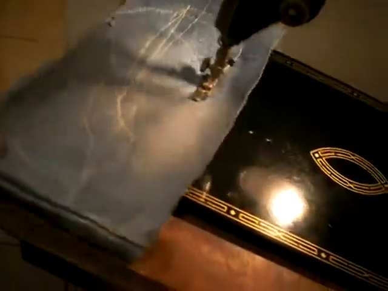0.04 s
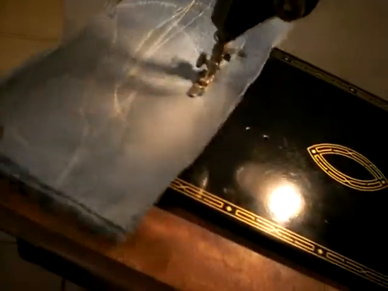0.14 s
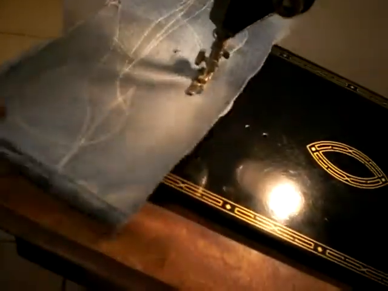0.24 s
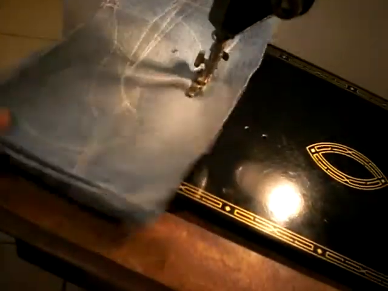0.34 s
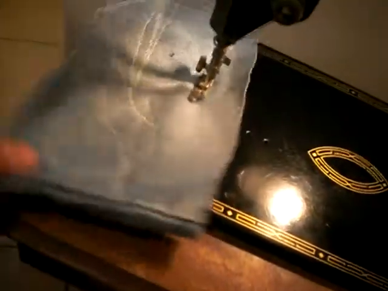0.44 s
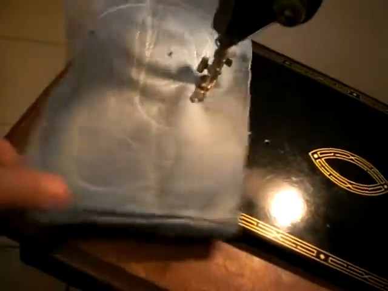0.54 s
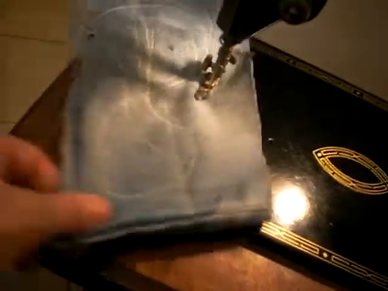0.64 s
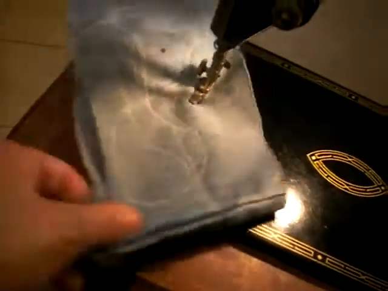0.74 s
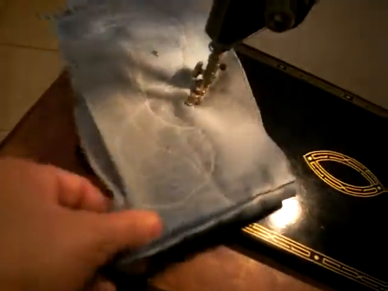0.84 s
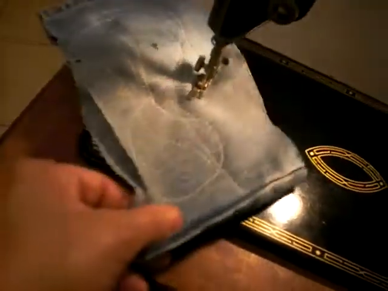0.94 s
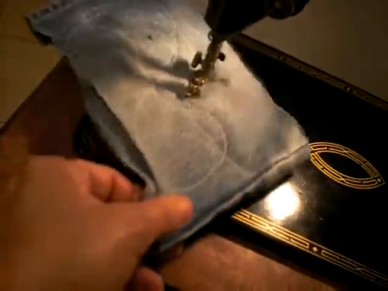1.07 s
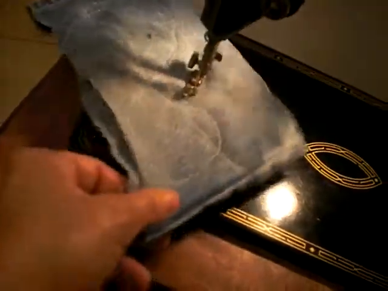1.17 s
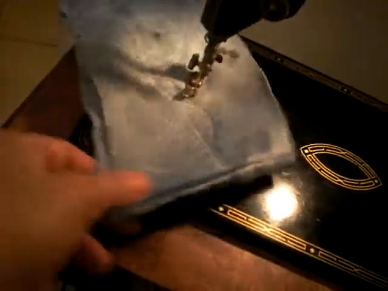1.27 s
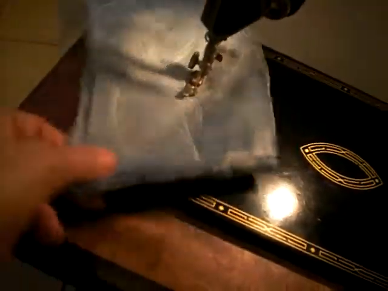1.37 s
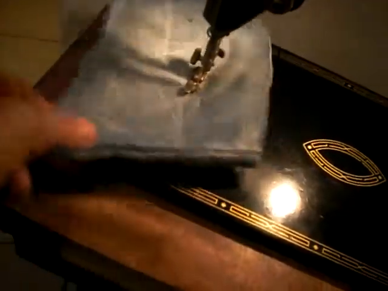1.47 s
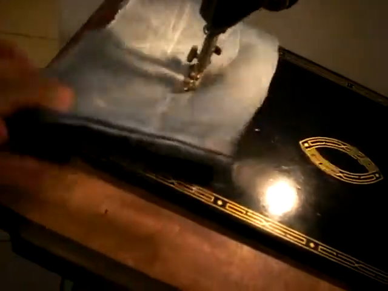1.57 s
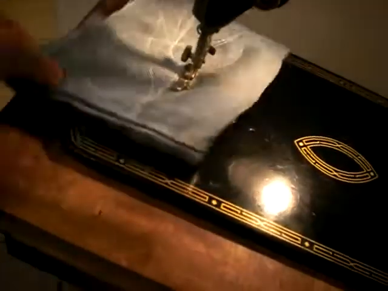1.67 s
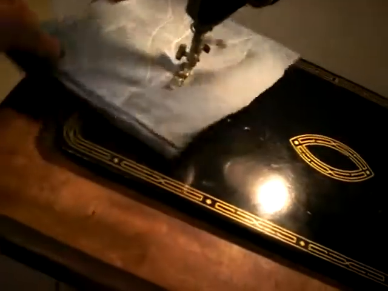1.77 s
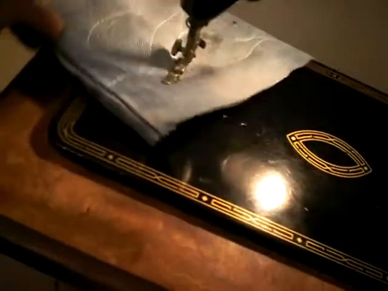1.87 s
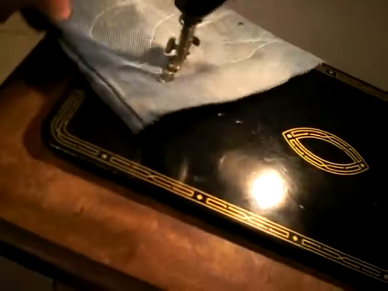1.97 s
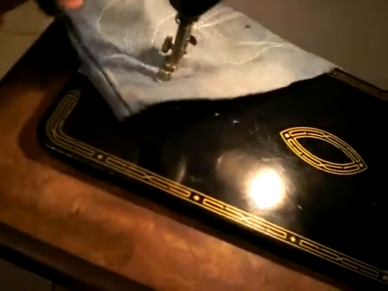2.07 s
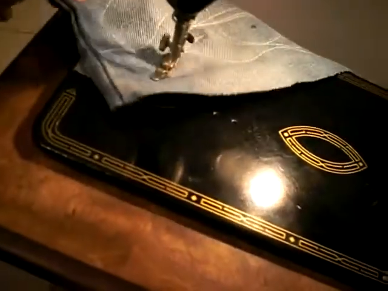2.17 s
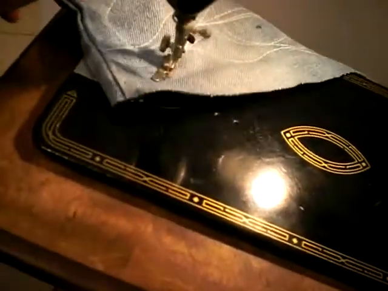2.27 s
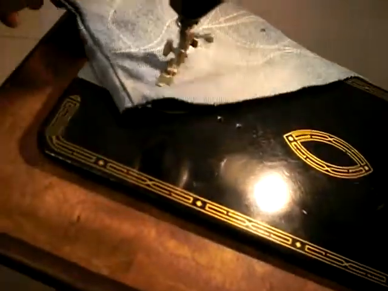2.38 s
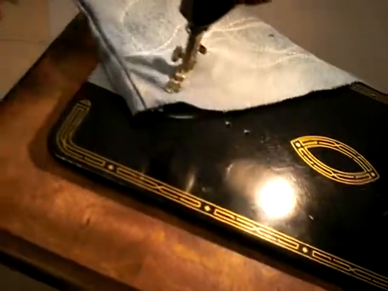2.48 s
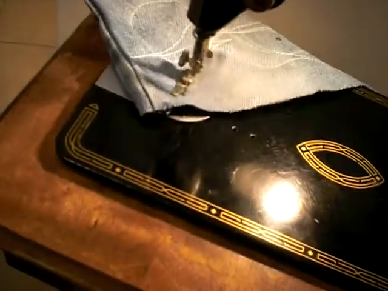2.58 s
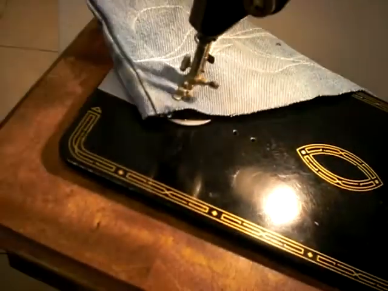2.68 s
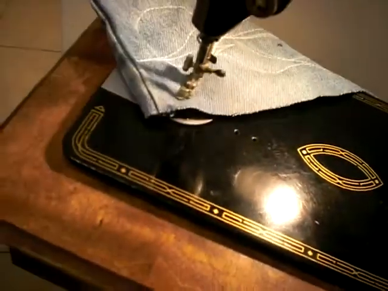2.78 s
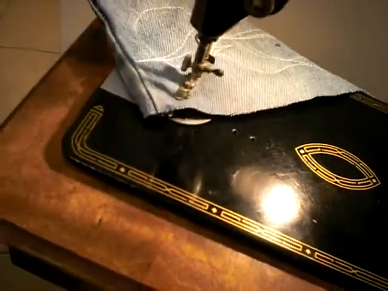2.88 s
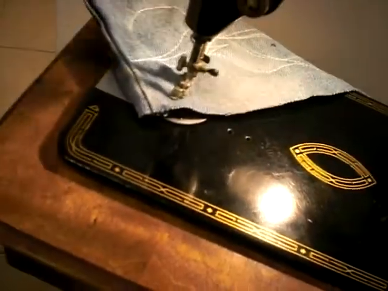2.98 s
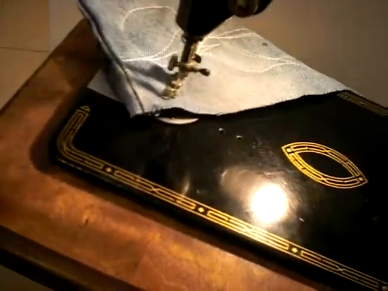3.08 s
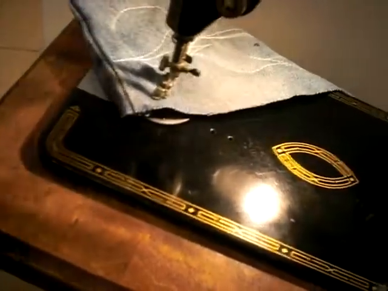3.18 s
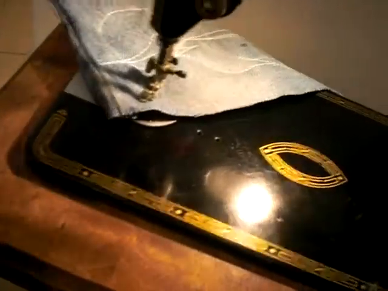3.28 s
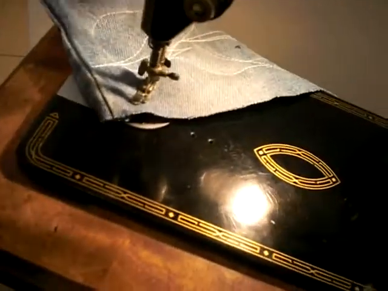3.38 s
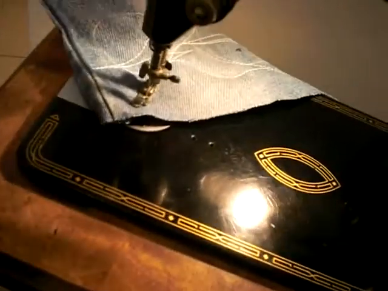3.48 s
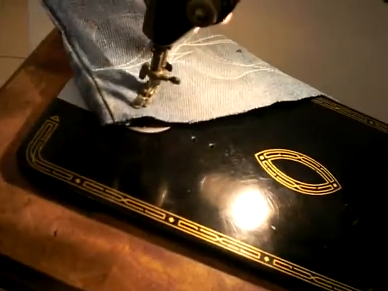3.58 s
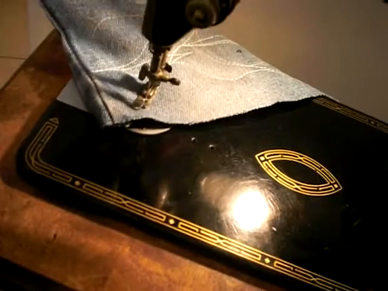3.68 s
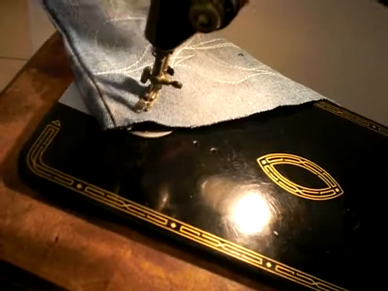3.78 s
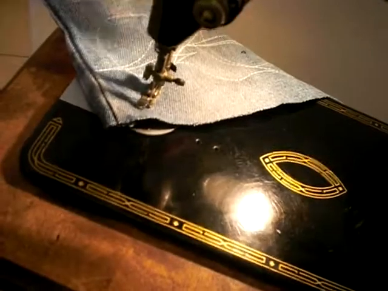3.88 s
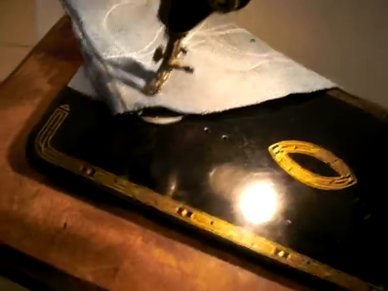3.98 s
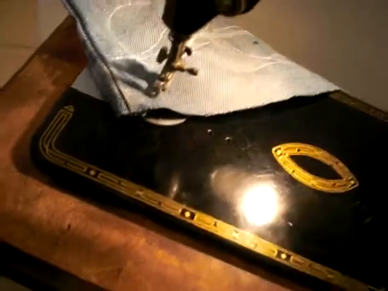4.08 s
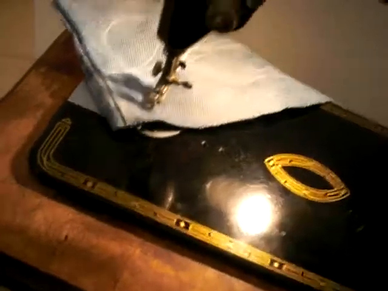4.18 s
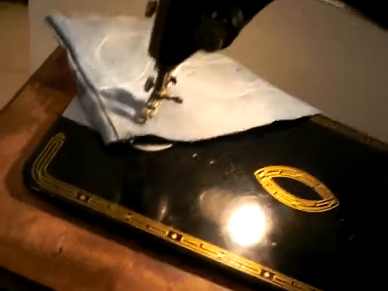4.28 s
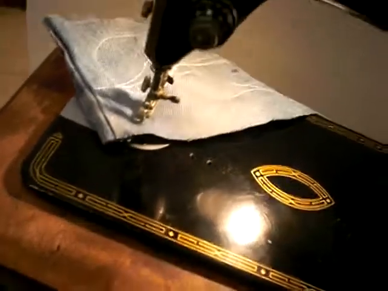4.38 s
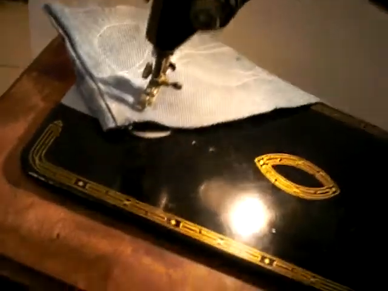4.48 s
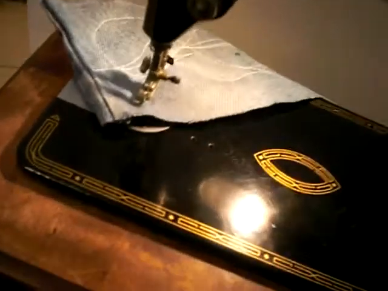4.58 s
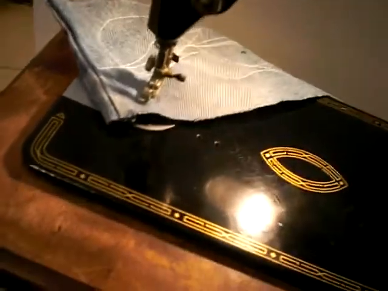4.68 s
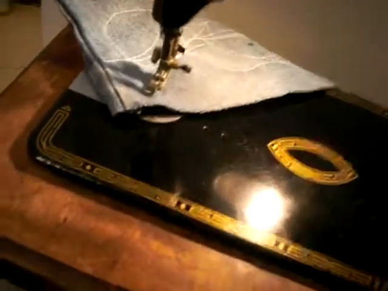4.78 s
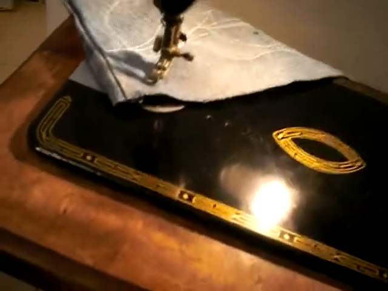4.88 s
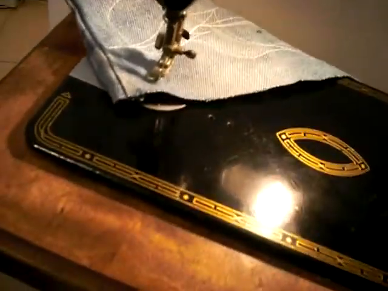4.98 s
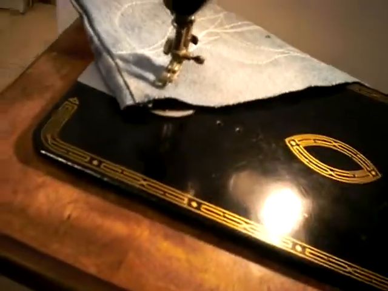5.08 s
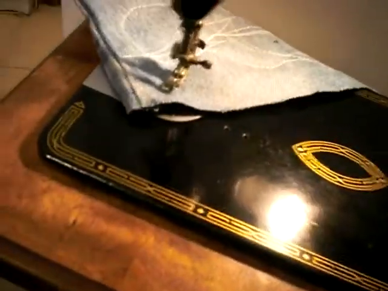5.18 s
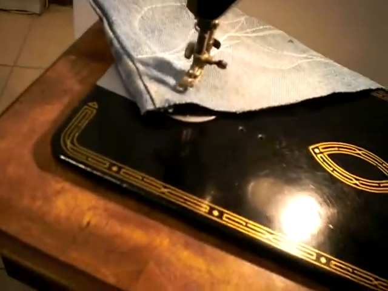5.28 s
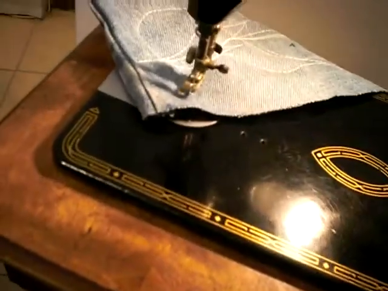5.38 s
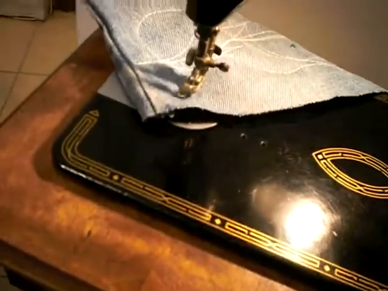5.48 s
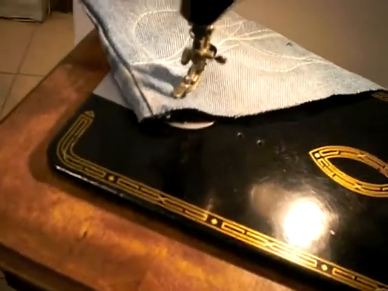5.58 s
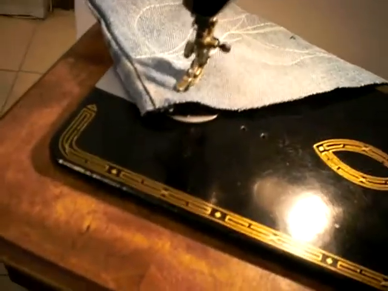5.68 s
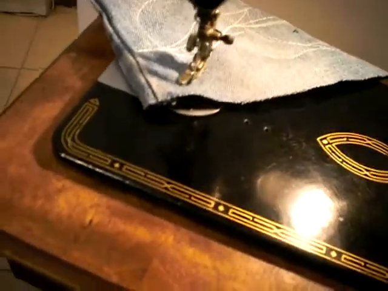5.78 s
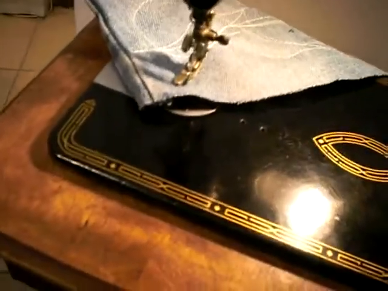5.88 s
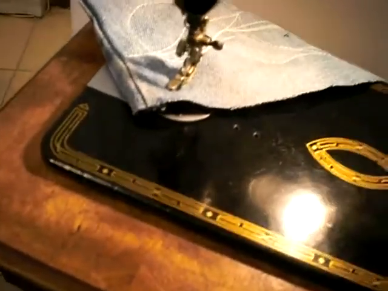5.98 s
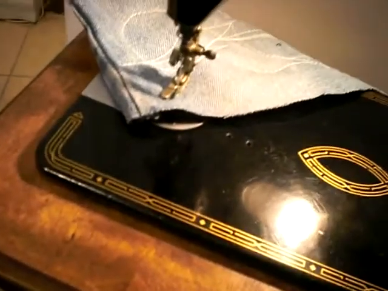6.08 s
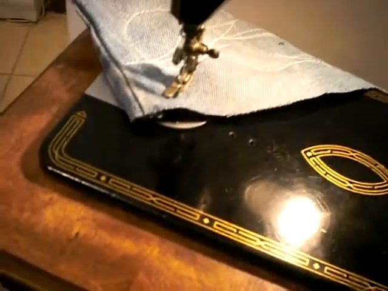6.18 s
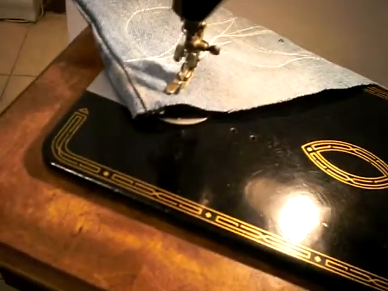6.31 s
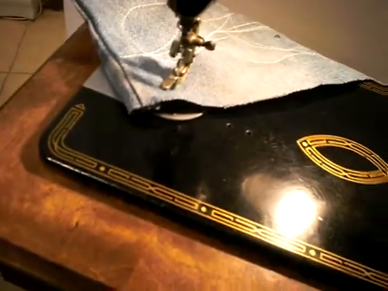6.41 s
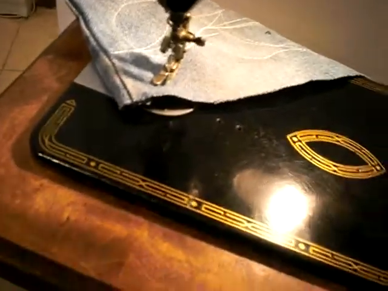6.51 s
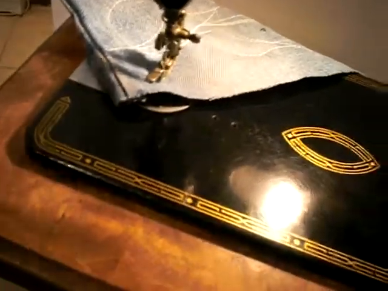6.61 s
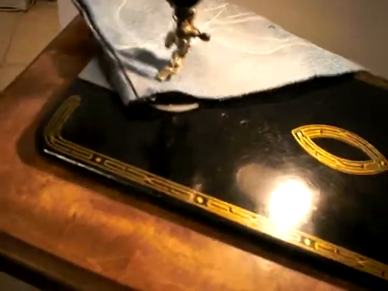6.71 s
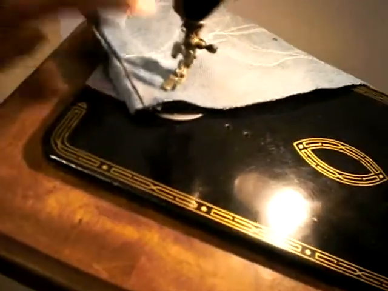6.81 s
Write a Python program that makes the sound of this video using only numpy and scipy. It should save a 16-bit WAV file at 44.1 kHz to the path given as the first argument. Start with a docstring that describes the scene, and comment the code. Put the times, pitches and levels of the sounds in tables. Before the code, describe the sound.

From the very start, an old cast-iron sewing machine is already running fast, about twelve stitches a second: a dense, regular metallic clatter with dry clacks, a hollow mid-low boom from the bed, rushing gears and a low motor hum. Thread-tightening snaps vary slightly from stitch to stitch. Around 2.3 s it slows sharply, the motor hum cuts near 2.5 s, and the last limp ticks die by 2.8 s. A quiet room remains, with wavering low hum and faint hiss. Cloth brushes softly around 3.2 and 3.5 s. A low lever clunk comes at 3.75 s, then a brighter double click near 4.1 s. Gentle fabric rustling continues. Tiny squeaks around 5.4 s precede a sharp catch click at 5.64 s and a heavier springy clunk at 5.8 s. Faint squeaks and cloth bumps follow near 6 s, then light rustling and room hum to the end, about 6.85 s.

```python
"""An old cast-iron sewing machine stitches fast, coasts to a stop, and is then handled in a quiet room.
Every turn of the shaft knocks the same joints in the same order; the bed booms, the motor hums.
Afterwards levers click and something squeaks over a faint room hum."""
import sys
import numpy as np
from scipy import signal
from scipy.fft import rfft
from scipy.io import wavfile
from scipy.ndimage import uniform_filter1d

SR = 44100
rng = np.random.default_rng(int(sys.argv[2]) if len(sys.argv) > 2 else 0)


def digitize_waveform(pressure):
    """Quantize a signal to 16-bit integers and store it at the path in sys.argv[1].

    Rows of a 2-D input are taken as channels; values are limited to [-1, 1].
    """
    field = np.atleast_2d(pressure).T
    bounded = np.clip(field, -1, 1)
    quanta = np.round(bounded * 32767).astype(np.int16)
    wavfile.write(sys.argv[1], SR, quanta)


N = 302085

# what each metal part rings with: (Hz, dB, t60 s)
PARTS = {
    "needle bar": [(2040, -7, 0.035), (2507, 5, 0.015), (4680, -6, 0.011), (4700, -9, 0.065), (5800, 0.5, 0.0075), (9960, -3, 0.0059), (9560, 2.5, 0.005), (11800, -26, 0.012)],
    "feed dog": [(2305, -3, 0.021), (6206, -1, 0.02), (9800, -4, 0.012), (11300, -15, 0.049)],
    "take-up": [(2490, 13, 0.0031), (4285, 7.5, 0.013), (5000, 7.5, 0.014), (6510, 9, 0.011), (9780, 1.5, 0.0109), (11600, -28.5, .01)],
    "hook": [(2360, -1, 0.027), (3840, -1.5, 0.023), (4320, -8, 0.016), (4590, 5, 0.013), (4620, -12, 0.082), (6070, 0.5, 0.016), (9800, -9, 0.022)],
    "bobbin case": [(2900, -9, 0.035), (4710, -5.5, 0.021), (6940, 7.5, 0.003), (8980, -8.5, 0.013)],
    "lifter": [(700, -8.5, 0.037), (1156, -10, 0.064), (1370, -12.5, 0.057), (2070, -1, 0.031), (2250, -14, 0.099), (4220, -8, .03), (4160, -19, 0.09), (4420, 1, 0.023),
               (5930, -4, 0.018), (8480, -4, 0.018), (10200, -6, 0.013)],
    "lever": [(1130, -8, 0.038), (1318, -6, 0.08), (1444, -13, 0.085), (2050, -5, 0.046), (2180, -11, .1), (2330, -19.5, 0.25), (2420, -10, .04), (3700, -10, .03), (4670, 3.5, 0.017),
              (6050, 0, 0.018), (6500, -7, 0.082), (7300, 4.5, 0.016), (8340, 1.5, 0.017), (9500, -2, 0.018), (11000, 4, 0.013)],
    "catch": [(2080, -20, 0.027), (3300, -18, 0.019), (4890, -10, 0.035), (4910, -26, 0.11), (6100, 0.5, 0.018), (6430, -9, 0.025), (7040, -7, 0.023), (7700, -12, 0.016),
              (8960, -6.5, 0.026), (9800, -10, 0.027), (11000, -11, 0.015)],
    "plate": [(787, -13.5, 0.048), (1250, -19, 0.21), (1374, -14.5, 0.08), (2500, -7, 0.032), (3110, -13, .025), (3310, -1, 0.031), (4240, -6, 0.015), (5300, -7, 0.014), (6730, -10, .02), (8480, -5, 0.013)],
    "spring": [(2930, -14, .03), (4460, -7, 0.018), (5760, -7, 0.018), (6300, -5, .022), (7250, -8, .022), (7660, -5, .022), (8330, -4, 0.015), (9420, -10, 0.028), (10800, -16, 0.014)],
    "pin": [(2600, -7, .014), (3710, 1, 0.0063), (4670, -7, .014), (5260, -7, .022), (7500, -6, 0.011), (10200, 1, .007), (11700, 0, .012)],
    "fabric": [(890, 13, 0.0016), (2510, 0, 0.00098), (5530, 14, 0.00067)],
}
# blows in each turn: (part, dB, rattle length s, wide crack dB, dB lost when the speed halves)
BLOWS = [("needle bar", -2.74, 0.0047, 7.6, 1), ("needle bar", -2, 0.0049, 2.6, 7), ("feed dog", 0, 0.0019, 1, -2), ("bobbin case", -2.5, 0.0067, 3, 6.4),
         ("take-up", -4, 0.0039, 4, 2.9), ("hook", -1.5, 0.003, 4, 3.2), ("bobbin case", -1.2, 0.0045, 0.87, 16),
         ("take-up", -8, 0.004, 2, 16)]  # fixed
BED = [(102, -13, 0.081), (150, -18, 0.031), (193, -10, 0.037), (310, -5.5, 0.12), (339, -1.5, 0.13), (410, 0, 0.046), (497, -13, 0.047), (664, -3.5, 0.046),
       (706, -7.5, 0.061), (909, -12, 0.047), (1127, -8.5, 0.059), (1374, -10.5, 0.093)]  # iron bed and table: (Hz, dB, t60 s)
# knocks into the bed in each turn: (share of the turn, dB, Hz that it favours, breadth in octaves, rise s)
KNOCKS = [(-.03, 1.5, 1040, 0.48, 0.00053), (.05, -33, 152.6, 0.79, 0.0032), (.27, 11.5, 890, 0.91, 0.01), (0.521, 0.5, 425, 1, 0.0069),
          (0.699, 15, 993, 0.12, 0.0046), (0.783, -5, 640, 0.44, 0.00069)]
# last settling ticks, and handling after the stop: (s, part, dB, rattle length s, wide crack dB, bed knock dB, Hz that it favours)
CLICKS = [(2.587, "needle bar", -36, 0.007, 2, -51, 395), (2.73, "hook", -54, 0.0025, 5, -59, 400),
          (2.766, "hook", -59, 0.0047, 8, -59, 403), (2.794, "hook", -56, 0.005, 4, -62, 400),
          (3.196, "fabric", -53, 0.0048, -3, -60, 400), (3.486, "fabric", -48.5, 0.0045, -5, -61, 400),
          (3.7507, "lifter", -27, 0.0015, -14, -27.5, 310), (3.779, "fabric", -60, .004, -10, -34, 320), (4.0714, "pin", -28, 0.0015, -12, -62, 397),
          (4.081, "catch", -40, 0.0022, 4, -65.5, 400),
          (4.087, "lever", -22.5, 0.0019, 1.5, -33, 344), (4.33, "fabric", -46, 0.0024, -2, -60, 400),
          (5.462, "catch", -60, .002, 6, -56, 400), (5.486, "fabric", -40, 0.024, -20, -32, 300), (5.6362, "catch", -15.5, 0.00042, -14, -46, 600),
          (5.806, "plate", -21.5, 0.0012, -16, -25.5, 493), (5.8107, "spring", -26.5, 0.0017, 3, -9.5, 148),
          (5.8159, "spring", -29.5, 0.002, 2.5, -62, 400), (6.009, "fabric", -49, 0.011, -7, -29, 313), (6.027, "fabric", -48, 0.0046, -13, -43, 328)]
SQUEAKS = [(5.384, 0.098, 2360, -62), (5.472, .03, 2360, -57), (5.994, 0.042, 2370, -59), (6.019, 0.032, 2350, -55)]  # (s, length s, Hz, dB)
WHIRR = [(30, -45), (60, -12), (110, -8), (270, -7.5), (350, -5), (480, -11.5), (690, -6.5), (1000, -8.5), (1500, -11),
         (2400, -11), (4600, -15.5), (7900, -17), (9700, -19.5), (12300, -22)]  # (Hz, dB per Hz)
AIR = [(18, -60), (42, -66), (86, -24), (108, -5.5), (161, -12.5), (192, -3.5), (217, -13), (341, -11), (387, -18),
       (473, -15.5), (800, -24.5), (1170, -26.5), (2130, -36), (2730, -34), (12000, -44), (15600, -66), (22000, -120)]  # room air and microphone hiss: (Hz, dB per Hz)
AIR_DB = [(3.8, -48.5), (4.6, -50.5), (5.55, -47.5), (6.85, -49.5)]  # level of the room air: (s, dB)
HUM = [(4.0, -48), (4.3, -50.5), (4.75, -48), (6.85, -50)]  # a wavering hum in the room: (s, dB)
HUM_HZ, FAINT_HUMS = 189, [(120, -61.5), (154.7, -69.5), (240, -62.5), (415.2, -63.5)]  # (Hz, dB)
ROOM = [(200, 0.32), (1000, 0.3), (4000, 0.17), (12000, 0.21)]  # (Hz, t60 s)
EDGE_HZ = 12050  # fixed
CLOTH = [(300, -35), (700, 9.5), (1300, 0), (3000, -2.5), (6000, -18), (12000, -15)]  # (Hz, dB per Hz)
# the bed shakes at its main pitches while the needle bar strokes: (Hz, from share of the turn, length s, dB)
BOOM = [(345, .589, 0.068, -2.5), (352.3, 0.33, 0.0274, -4), (707, .22, 0.023, -9), (408, .758, 0.04, -8.5), (698, .73, 0.017, -8), (915, .66, 0.019, -8.5)]
BLOW_SHARES = (-.025, .015, .27, .4, .485, .588, .69, .895)  # where in the turn each blow falls  # fixed
# main shaft, one stitch a turn; it runs, coasts, crawls and stops: (s, turns per s)
SPEED = [(0, 12.198), (.8, 12.2354), (2.2772, 12.0488), (2.6294, 4.2626), (2.73, 4.2626), (2.84, 0)]  # fixed
CRACK_BAND = signal.butter(3, [2000., 11500.], "bandpass", fs=SR, output="sos")  # fixed
SIZZLE_T60_S = 0.082
SCATTER_DB = .6  # force differs little from turn to turn  # fixed
SNAP_SHARE = .485  # except the blow that pulls the thread tight  # fixed
# extra force of that blow, stitch by stitch from the second on: (dB)
SNAP_DB = [-3, -19, -4, 2, -15, -2, -5, -4, -8, -8, -5, -3, -15, 0.5, -7, 0, -14, -5, -4.5, -37, 1.5, 1, 0, 1, -1, 5]
START_TURNS = -.0252  # shaft angle at 0 s  # fixed
METAL_DB, BED_DB, WHIRR_DB = -22, -25, -29  # at full speed
BED_SLOW_DB, BOOM_SLOW_DB, WHIRR_SLOW_DB = 0, 20, 13  # lost when the speed halves
SLACK_S, SLACK_DB_PER_S = 2.592, -130  # in the last crawl the blows go limp
MOTOR_DB, MOTOR_SAG_DB_PER_S, MOTOR_OFF_S, MOTOR_FADE_DB_PER_S = -41.5, -1.5, 2.46, -380
# fabric slides under the hands, each time swelling and fading: (middle s, half length s, dB)
SLIDES = [(3.197, 0.19, -71), (3.61, 0.59, -67), (4.35, 0.057, -66), (4.8, 0.36, -63), (5.487, 0.056, -57.5), (5.75, 0.22, -61.5), (6.186, 0.053, -61), (6.504, 0.49, -64)]
RUNNING_SPREAD, RESTING_SPREAD = 3.3, 1.7  # cluster half width in Hz times t60 in s  # fixed


def gain_of(db):
    return 10 ** (np.asarray(db) / 20)


def evened(x):
    return x / np.sqrt(np.mean(x ** 2) + 1e-20)


def read(points, hz):
    f, value = np.transpose(points)
    return np.interp(np.log(hz + 1), np.log(f + 1), value)


def curve(rows):
    s, value = np.transpose(rows)
    return np.interp(np.arange(N) / SR, s, value)


def add(mix, s, sound):
    at = round(s * SR)
    part = mix[max(at, 0):][:max(len(sound) + min(at, 0), 0)]
    part += sound[max(-at, 0):][:len(part)]


def ring(modes, rise_s):
    """Dying sines of a struck part."""
    hz, db, t60 = np.transpose(modes)[:, :, None]
    t = np.arange(int(t60.max() * SR) + 64) / SR
    return (gain_of(db - 60 * t / t60) * np.sin(2 * np.pi * hz * t)).sum(0) * (1 - np.exp(-t / rise_s))


def noise(spectrum, patchy_db):
    """Random short-time spectra with drifting patches."""
    frames, hz = N // 256 + 5, np.fft.rfftfreq(1024, 1 / SR)
    a, b, patches = rng.standard_normal((frames, 513, 3)).T
    patches = evened(uniform_filter1d(uniform_filter1d(patches, size=12, axis=0), size=14, axis=1))
    z = (a + 1j * b) * gain_of(read(spectrum, hz)[:, None] + patchy_db * patches)
    return evened(signal.istft(z, nperseg=1024, noverlap=768)[1][:N])


def wander(rate_hz):
    """Slow chance of rms 1."""
    return evened(signal.lfilter([1], [1, -np.exp(-2 * np.pi * rate_hz / SR)], rng.standard_normal(N)))


def clack(part, rattle_s, crack_db, firm, sizzle_db, rise_s, count, spread):
    """One firm tick, then loose metal chatters; the ticks ring the part and are heard as a wide crack with a dense sizzle behind it."""
    t = np.arange(SR // 9) / SR
    ticks, size, hiss = rng.standard_normal((3, len(t)))
    chatter = ticks * gain_of(1.65 * size) * np.exp(-t / max(rattle_s, 2e-4)) * (1 - np.exp(-t / max(0.36 * rattle_s, 1e-5)))
    chatter /= np.linalg.norm(chatter)
    chatter[0] += firm
    # each listed mode stands for a cluster of neighbours, the wider the faster it dies, widest in parts that run loose
    cluster = np.repeat(PARTS[part], count, axis=0)
    places = np.tile(np.linspace(-1, 1, count), len(PARTS[part])) + 0.22 * rng.standard_normal(len(cluster))
    cluster[:, 0] += spread * places / np.maximum(cluster[:, 2], .012)
    push = np.interp(cluster[:, 0], np.fft.rfftfreq(len(t), 1 / SR), abs(rfft(chatter)))
    cluster[:, 1] -= 20 * np.log10(push + 0.3)  # however the ticks fall, the part keeps its colour
    rung = signal.fftconvolve(chatter, ring(cluster, rise_s) / np.sqrt(count))
    wide = 9 * gain_of(crack_db) * chatter + gain_of(sizzle_db - 60 * t / SIZZLE_T60_S) * hiss
    add(rung, 0, signal.sosfilt(CRACK_BAND, wide))
    return rung


def knock(centre_hz, octaves, rise_s):
    """A dull push rings the bed, most near the pitch that its place favours."""
    return ring([(hz, db - 6 * (np.log2(hz / centre_hz) / octaves) ** 2, t60) for hz, db, t60 in BED], rise_s)


def stitching():
    """The shaft angle times every blow; slack in the joints scatters time and force a little."""
    out = np.zeros(N)
    knocks = [knock(*row[2:]) for row in KNOCKS]
    for turn in range(-1, 32):
        for share, (part, db, rattle_s, crack_db, slow_db) in zip(BLOW_SHARES, BLOWS):
            late, hard = rng.standard_normal(2)
            at, halvings = shaft(turn + share)
            if np.isfinite(at):
                force_db = METAL_DB - slow_db * halvings + limp_db(at) + SCATTER_DB * hard
                if share == SNAP_SHARE and 0 < turn <= len(SNAP_DB):
                    force_db += SNAP_DB[turn - 1]
                add(out, at + .0006 * late, gain_of(db + force_db) * clack(part, rattle_s, crack_db, firm=0.35, sizzle_db=-20.5, rise_s=0.00053, count=8, spread=RUNNING_SPREAD))
        for (share, db, *_), sound in zip(KNOCKS, knocks):
            late, hard = rng.standard_normal(2)
            at, halvings = shaft(turn + share)
            if np.isfinite(at):
                force_db = BED_DB - BED_SLOW_DB * halvings + 2 * limp_db(at) + 0.25 * hard
                add(out, at + 0.00028 * late, gain_of(db + force_db) * sound)
    return out


def motor():
    """The windings hum at twice the mains frequency until the current is cut."""
    t = np.arange(N) / SR
    db = MOTOR_DB + MOTOR_SAG_DB_PER_S * t + MOTOR_FADE_DB_PER_S * np.maximum(t - MOTOR_OFF_S, 0)
    return gain_of(db) * np.sqrt(2) * np.sin(2 * np.pi * 120 * t)  # fixed


def handling():
    """Single clicks of levers and plates, brushes of fabric, and short squeaks."""
    out = np.zeros(N)
    for s, part, db, rattle_s, crack_db, bed_db, centre_hz in CLICKS:
        add(out, s, gain_of(db) * clack(part, rattle_s, crack_db, firm=0.98, sizzle_db=-11.0, rise_s=0.00019, count=4, spread=RESTING_SPREAD))
        add(out, s, gain_of(bed_db) * knock(centre_hz, octaves=0.46, rise_s=0.0041))
    for s, length, hz, db in SQUEAKS:
        t = np.arange(round(length * SR)) / SR
        slip = np.cumsum(rng.standard_normal(len(t))) * 0.046  # the phase slips as the joint sticks
        add(out, s, gain_of(db) * np.sqrt(2) * np.sin(2 * np.pi * hz * t + slip) * np.sin(np.pi * t / length))
    return out


def background():
    """Room air, one wavering hum and a few fainter lines."""
    t = np.arange(N) / SR
    air = noise(AIR, patchy_db=.8)  # fixed
    waver_db = 1.4 * evened(uniform_filter1d(wander(2.8), size=1500))  # fixed
    hum = gain_of(curve(HUM) + waver_db) * np.sin(2 * np.pi * HUM_HZ * t + 0.3 * wander(1.5))  # fixed
    faint = sum(gain_of(db + 0.66 * wander(1.0)) * np.sin(2 * np.pi * hz * t + 0.14 * wander(3.4)) for hz, db in FAINT_HUMS)
    return gain_of(curve(AIR_DB)) * air + np.sqrt(2) * (hum + faint)


def room(x):
    """Sparse taps of random sign, each band dying at its own speed."""
    taps = np.zeros(SR // 2)
    at = np.arange(140, SR // 2 - 20, 20)
    taps[at + rng.integers(0, 20, at.shape)] = rng.choice([-1., 1.], at.shape)
    hz, t, z = signal.stft(taps, SR, nperseg=256)
    tail = signal.istft(z * gain_of(-60 * t / read(ROOM, hz)[:, None]), SR, nperseg=256)[1]
    return signal.fftconvolve(x, tail / np.linalg.norm(tail))[:N]


def whirr():
    """Belt and gears rush while the shaft turns."""
    halvings = np.log2(SPEED[0][1] / np.maximum(curve(SPEED), .01))
    return gain_of(WHIRR_DB - WHIRR_SLOW_DB * halvings) * noise(WHIRR, patchy_db=1.0)


def fabric():
    """A soft, grainy rustle."""
    t = np.arange(N) / SR
    strokes = sum(gain_of(db) * np.exp(-((t - s) / half_s) ** 2) for s, half_s, db in SLIDES)
    return strokes * gain_of(2.1 * wander(60.)) * noise(CLOTH, patchy_db=1.8)  # fixed


def boom():
    """Swells of the bed's main tones in every turn, set off afresh at the same shaft angles; they fade as the shaft slows."""
    out = np.zeros(N)
    for turn in range(-1, 30):
        for hz, share, length, db in BOOM:
            at, halvings = shaft(turn + share)
            t = np.arange(round(length * SR)) / SR
            late, hard = rng.standard_normal(2)
            swell = signal.windows.tukey(len(t), .7) * np.sin(2 * np.pi * hz * t)
            add(out, at + 0.0001 * late, gain_of(db + BED_DB - BOOM_SLOW_DB * halvings + 0.36 * hard) * swell)
    return out


def shaft(turns):
    """The moment (s) at which the shaft reaches an angle, and how many halvings of speed it has lost by then."""
    speeds_s, speeds = np.transpose(SPEED)
    t = np.arange(-100, 1000 * speeds_s[-1]) / 1000  # fixed
    speed = np.interp(t, speeds_s, speeds)
    angle = (np.cumsum(speed) - speed / 2) / 1000  # fixed
    angle += START_TURNS - np.interp(0, t, angle)  # fixed
    at = np.interp(turns, angle, t, right=np.inf)
    return at, np.log2(speeds[0] / np.maximum(np.interp(at, speeds_s, speeds), 1))


def limp_db(s):
    """Force lost in the last crawl."""
    return SLACK_DB_PER_S * np.maximum(s - SLACK_S, 0)


def scene():
    running, handled = stitching() + whirr(), handling()
    small = signal.butter(4, 70., "highpass", fs=SR, output="sos")  # too small to radiate deep bass
    direct = signal.sosfilt(small, running + handled)
    echoed = room(signal.sosfilt(small, gain_of(-13.0) * running + gain_of(-16.0) * handled))
    return (direct + echoed + boom() + motor() + fabric() + background())[None]


def record(dry):
    """The band limit of the recorder."""
    return signal.oaconvolve(dry, signal.firwin(511, EDGE_HZ, window=("kaiser", 9), fs=SR)[None], "same")


dry = scene()
out = record(dry)
digitize_waveform(out)
```